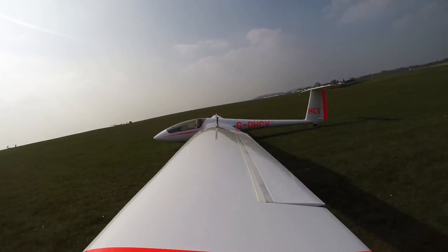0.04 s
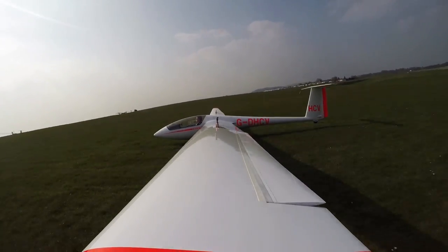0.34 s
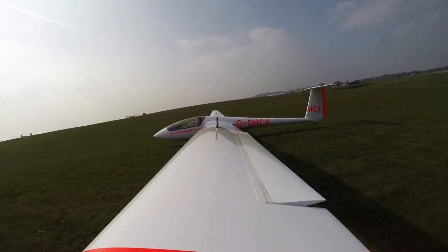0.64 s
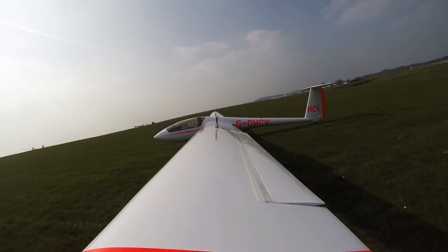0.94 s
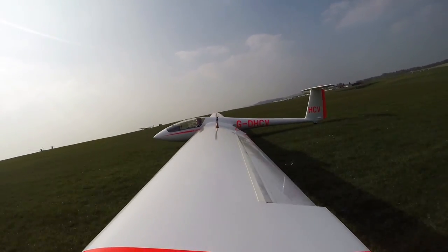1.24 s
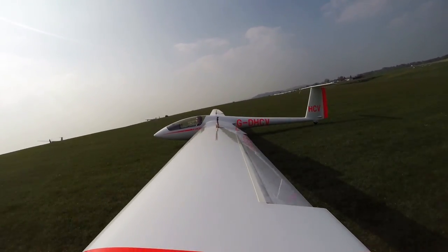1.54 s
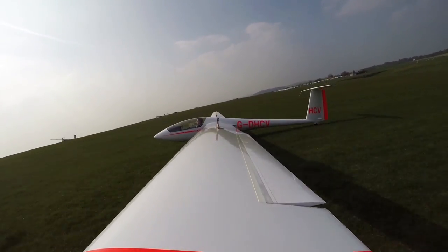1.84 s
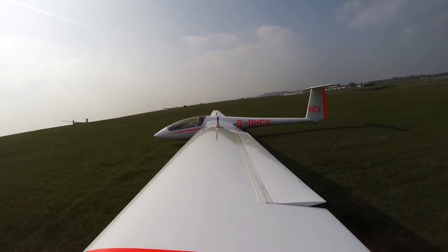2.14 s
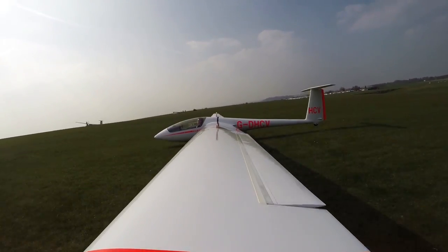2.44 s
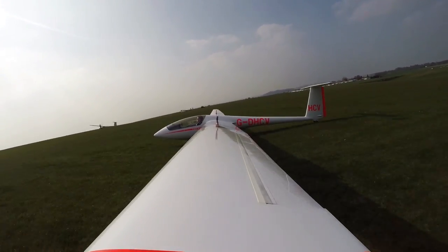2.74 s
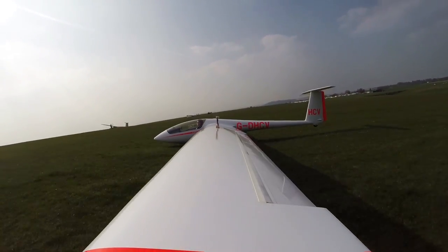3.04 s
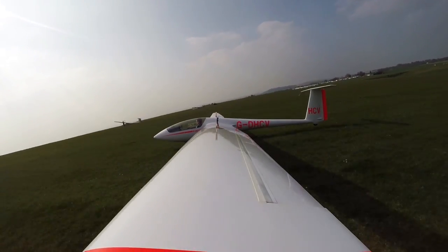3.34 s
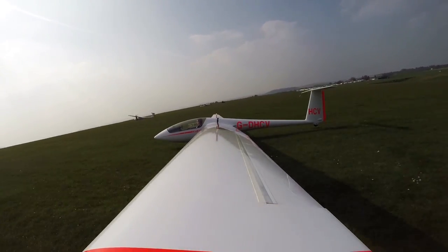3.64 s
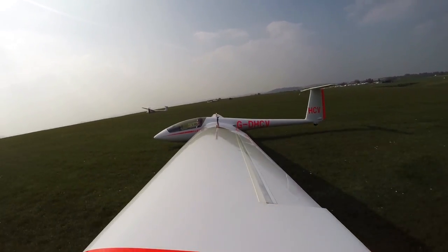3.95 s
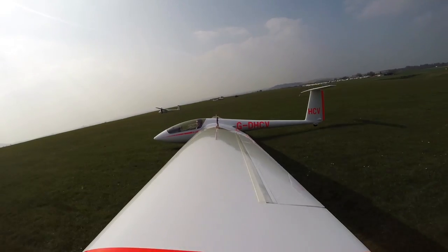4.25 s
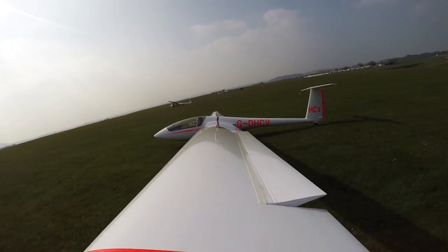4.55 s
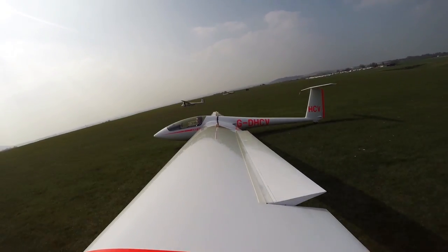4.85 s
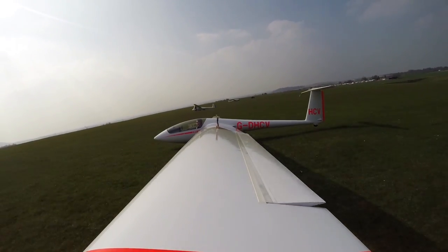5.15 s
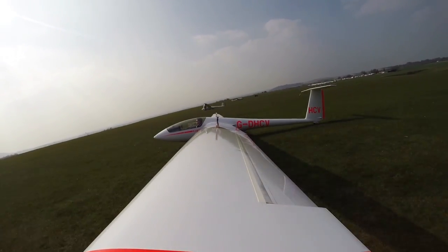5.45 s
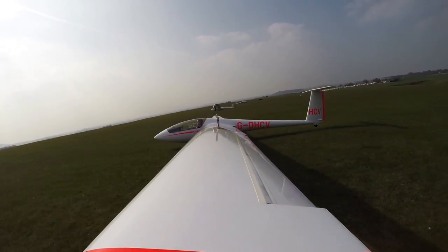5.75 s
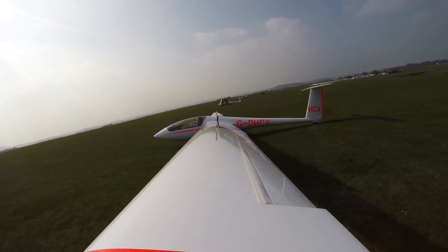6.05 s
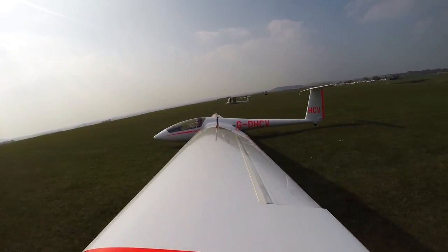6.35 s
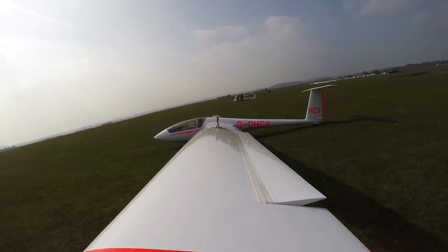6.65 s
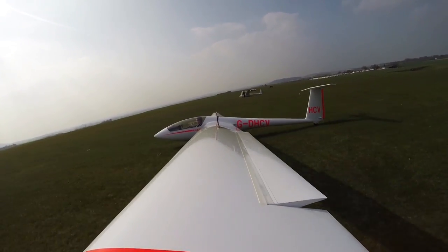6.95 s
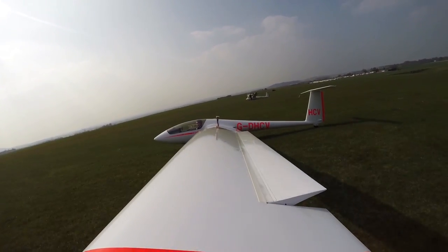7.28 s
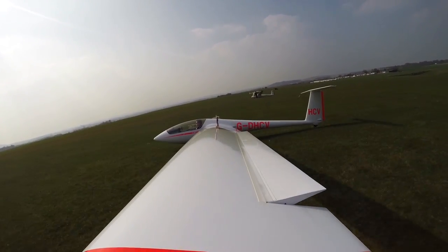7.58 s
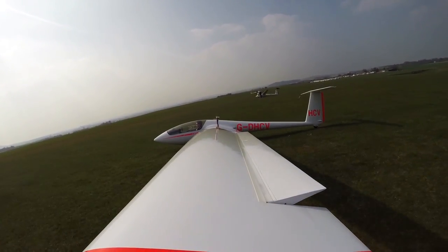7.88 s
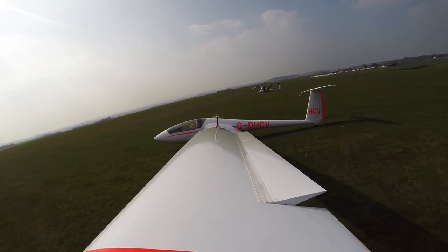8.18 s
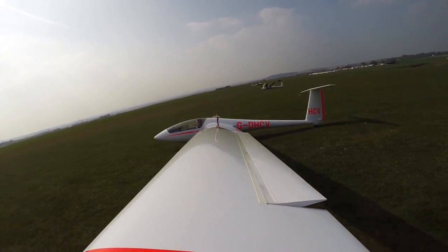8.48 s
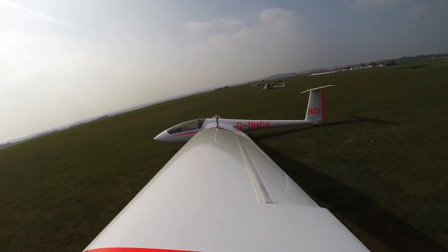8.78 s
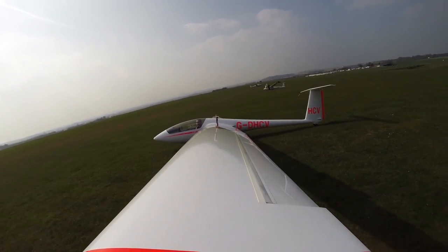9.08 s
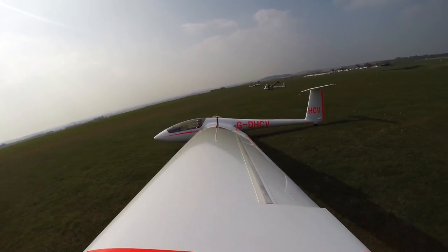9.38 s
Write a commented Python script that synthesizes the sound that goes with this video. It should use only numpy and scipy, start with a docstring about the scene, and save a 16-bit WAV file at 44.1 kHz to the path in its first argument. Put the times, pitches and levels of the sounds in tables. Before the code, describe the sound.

A glider rolls across a grass airfield, heard close up from a microphone on its wing. The wheel rumbles and air hisses and buffets, both fading as it slows. A loose fitting starts ticking sharply right by the microphone and grows louder. Later come a low drone, a short airframe groan, hollow knocks in the wing and a faint squeak, then a thud and a brief rattle of the control linkage.

```python
"""A glider's wheel rumbles over a grass airfield, heard close up from a camera microphone on the wing.
The turf shakes the airframe and air hisses over the wing; both die away as the glider slows.
Right by the microphone, the shaking makes a loose fitting tick sharply against the camera housing.
Near the end, bumps knock through the hollow wing and the control linkage clacks and rattles,
over a low drone, a short groan of the airframe and a faint squeak."""
import sys
import numpy as np
from scipy import signal
from scipy.fft import rfft, irfft, next_fast_len
from scipy.io import wavfile
from scipy.ndimage import map_coordinates

SR = 44100
rng = np.random.default_rng(int(sys.argv[2]) if len(sys.argv) > 2 else 0)


def master(y):
    """Save y as 16-bit WAV."""
    cut = np.clip(np.atleast_2d(y).T, -1, 1)
    pcm = np.round(cut * 32767)  # scale
    wavfile.write(sys.argv[1], SR, pcm.astype(np.int16))


N = 419832

# resonances of the wing shell: centre_hz, width_hz, gain_db
SHELL_MODES = [(380, 203, -3.5), (584, 60, -9.5), (735, 123, -1.5), (1057, 240, -11.5), (1660, 280, -26.5),
               (2150, 190, -25.5)]
# narrow resonances of the wing panels: centre_hz, width_hz, gain_db
PANEL_MODES = [(298.5, 38, 1), (361, 50, -3.5), (437, 26, -2.5), (771, 40, -1), (962, 155, -10.5)]
FULL_ROLL_DB = -18  # shaking at full rolling speed


def amp(db):
    """Decibels to gain."""
    return 10 ** (np.asarray(db) / 20)


def unit(x):
    """Scale to rms 1."""
    return x / np.sqrt(np.mean(x ** 2) + 1e-20)


def along(points, hz):
    """Read (frequency_hz, value) points on a log frequency axis."""
    point_hz, values = np.transpose(points)
    return np.interp(np.log(hz + 1), np.log(point_hz), values)


def curves(rows):
    """One value per sample for each column after the time."""
    times, *columns = np.transpose(rows)
    return [np.interp(np.arange(N) / SR, times, column) for column in columns]


def wobble(rate_hz):
    """A smooth random curve through rate_hz knots a second."""
    knots = rng.standard_normal(int(N * rate_hz / SR) + 4)
    return map_coordinates(knots, [np.arange(N) * rate_hz / SR])


def filtered(x, response):
    """Filter x by a gain given as a function of frequency."""
    size = next_fast_len(len(x) + 8192)
    return irfft(rfft(x, size) * response(np.fft.rfftfreq(size, 1 / SR)), size)[:len(x)]


def noise(spectrum):
    """Coloured noise of rms 1."""
    return unit(filtered(rng.standard_normal(N), lambda hz: amp(along(spectrum, hz))))


def tone(rows, waver, waver_hz, flutter_db):
    """An unsteady tone on a pitch and level curve, silent outside it."""
    hz, db = curves(rows)
    t = np.arange(N) / SR
    phase = 2 * np.pi * np.cumsum(hz * (1 + waver * wobble(waver_hz))) / SR
    sounding = (t > rows[0][0]) & (t < rows[-1][0])
    return sounding * amp(db + flutter_db * wobble(waver_hz)) * np.sqrt(2) * np.sin(phase)


def add(track, start_s, sound):
    """Mix a sound in at start_s."""
    start = round(start_s * SR)
    track[start:start + len(sound)] += sound[:N - start]


def impulse_response(modes, notches=(), size=4096):
    """Ring of a struck body with these resonances and notches, peak 1."""
    hz = np.fft.rfftfreq(size, 1 / SR)
    bell = lambda centre, width: 1 / (1 + ((hz ** 2 - centre ** 2) / (width * (hz + 1))) ** 2)
    gain = sum(amp(db) * bell(centre, width) for centre, width, db in modes)
    gain *= amp(sum(db * bell(centre, width) for centre, width, db in notches))
    cepstrum = irfft(np.log(gain + 1e-6))
    cepstrum[1:size // 2] *= 2  # minimum phase: nothing rings before the strike
    cepstrum[size // 2:] = 0
    ring = irfft(np.exp(rfft(cepstrum)))
    return ring / np.abs(ring).max()


def tilted(modes, db_per_octave):
    """The same resonances, struck by a harder or softer contact."""
    return [(hz, width, db + db_per_octave * np.log2(hz / modes[0][0])) for hz, width, db in modes]


def scattered_blow(body, size=128, count=80):
    """A body's ring scattered along the hollow wing; the treble dies first. Peak 1."""
    # time the wing takes to fall 60 dB: frequency_hz, decay_s
    decay_times = [(300, 0.087), (800, 0.088), (1500, 0.063), (4000, 0.032)]
    half = size // 2
    hz = np.fft.rfftfreq(size, 1 / SR)
    t = np.arange(count)[:, None] * half / SR
    white = rng.standard_normal((count + 1, half))
    frames = np.hstack([white[:-1], white[1:]]) * np.hanning(size)
    frames = irfft(rfft(frames) * amp(-60 * t / along(decay_times, hz)))
    scatter = (frames[:-1, half:] + frames[1:, :half]).ravel()
    blow = signal.fftconvolve(scatter, body)
    return blow / np.abs(blow).max()


def bending_blow(shell, travel_s, scatter_db, soft_hz=2900, echo_s=.0035, echo_db=-8, size=2048):
    """Bending waves bring the treble first: a blow falls in pitch, echoes off a rib and scatters."""
    low_hz, top_hz = 200, 4000
    hz = np.fft.rfftfreq(size, 1 / SR)
    delay_s = travel_s * (np.sqrt(top_hz / np.clip(hz, low_hz, top_hz)) - 1)
    dispersion = np.exp(-2j * np.pi * np.cumsum(delay_s) * SR / size)
    echo = amp(echo_db) * np.exp(-2j * np.pi * hz * echo_s * rng.uniform(.8, 1.2))
    sweep = irfft(dispersion * (1 + echo) / (1 + (hz / soft_hz) ** 8))
    direct = signal.fftconvolve(sweep, shell)
    blow = amp(scatter_db) * scattered_blow(direct)
    blow[:len(direct)] += direct / np.abs(direct).max()
    return blow / np.abs(blow).max()


def linkage_blow(db_per_octave):
    """One clack of the control linkage; harder contacts are brighter."""
    # resonances of the linkage: centre_hz, width_hz, gain_db
    modes = [(1500, 960, 0.5), (2480, 340, 5.5), (3220, 440, -8), (4050, 500, -12), (5050, 600, -12.5),
             (7040, 1600, -26)]
    return scattered_blow(impulse_response(tilted(modes, db_per_octave), size=1024))


def gusting():
    """Swells and lulls of the airflow in dB."""
    # gusts and lulls: centre_s, change_db, half_length_s
    gusts = [(0.445, -2, 0.043), (0.844, 1, .05), (0.963, -2.5, 0.034), (1.107, -0.5, 0.033),
             (1.576, 1, 0.032), (1.775, 1.5, .04), (1.85, -3, 0.034), (2.058, 3, 0.032),
             (2.376, -3.5, 0.038), (2.92, 1.5, 0.11), (3.61, 3.5, 0.064), (3.91, 2.5, 0.023),
             (5.017, 4.5, 0.028)]
    t = np.arange(N) / SR
    return sum(db * np.exp(-((t - s) / width) ** 2) for s, db, width in gusts)


def lurching():
    """Strength of the glider's last lurches: each swells to its crest and dies away."""
    # lurches, rise and fall timed over 20 dB: crest_s, strength_db, rise_s, fall_s
    lurches = [(8.535, -24.5, 0.071, 0.3), (8.803, -30.5, 0.026, 0.038), (8.89, -23, 0.1, 0.18),
               (9.071, -24.5, 0.038, 0.036), (9.23, -35, 0.076, 0.093)]
    t = np.arange(N) / SR
    return sum(amp(db - 20 * np.maximum((s - t) / rise, (t - s) / fall))
               for s, db, rise, fall in lurches)


def shaking(lurch_rumble_db=-13, lurch_roar_db=-10):
    """Drive in dB for the wheel rumble and the wing roar: rolling plus the lurches."""
    # how hard the turf shakes the slowing glider: time_s, rumble_db, roar_db
    roll = [(0, -18, -18.5), (1.4, -18.5, -20), (2.25, -18, -18.5), (3.0, -17.5, -21), (3.34, -23, -24),
            (3.55, -16.5, -21), (4.95, -16.5, -20), (5.3, -18, -23), (5.65, -15.5, -17.5),
            (5.9, -18.5, -25), (6.05, -17.5, -25.5), (6.2, -16, -22), (6.42, -16.5, -27),
            (6.58, -20, -32.5), (6.88, -18.5, -29.5), (6.96, -24, -40), (7.07, -17.5, -34),
            (7.14, -31.5, -39), (7.21, -20, -36), (7.47, -37.5, -45), (7.95, -41.5, -49), (8.25, -46, -53),
            (8.72, -41.5, -50), (8.9, -32, -46), (9.35, -54, -52), (9.52, -49, -51)]
    rumble_db, roar_db = curves(roll)
    lurch = lurching()
    return (20 * np.log10(np.hypot(amp(rumble_db), amp(lurch_rumble_db) * lurch)),
            20 * np.log10(np.hypot(amp(roar_db), amp(lurch_roar_db) * lurch)))


def field_quiet(level_db=-58):
    """Still air over the open airfield."""
    # background spectrum: frequency_hz, density_db
    spectrum = [(100, 3), (1000, -8), (2500, -16), (5000, -19.5), (7200, -24), (10000, -29.5), (12500, -30),
                (15000, -44)]
    return amp(level_db) * noise(spectrum)


def rustle(flicker_db=3):
    """A faint, flickering rustle, like grass brushing past, as the wind hiss dies."""
    # course of the rustle: time_s, level_db
    levels = [(6.1, -90), (6.25, -76), (6.55, -72), (6.8, -83), (7.0, -73), (7.35, -70), (7.58, -75),
              (7.65, -90)]
    # its thin treble: frequency_hz, density_db
    spectrum = [(3500, -28), (6300, -14), (7200, 2), (8000, 0), (8900, -13), (14000, -28)]
    db, = curves(levels)
    return amp(db) * unit(amp(flicker_db * wobble(90)) * noise(spectrum))


def squeak(upper_ratio=1.19, upper_db=-11):
    """A rubbing joint squeaks faintly, with a rougher partial above it."""
    # lower partial: time_s, pitch_hz, level_db
    lower = [(7.65, 3300, -90), (7.67, 3230, -58), (7.71, 3020, -60), (7.76, 3060, -66), (7.81, 3010, -63),
             (7.87, 3000, -71)]
    upper = [(s, upper_ratio * hz, db + upper_db) for s, hz, db in lower]
    return (tone(lower, waver=.017, waver_hz=370, flutter_db=-2)
            + tone(upper, waver=.03, waver_hz=370, flutter_db=-4))


def drone():
    """A low drone sinks as the glider slows."""
    # course of the drone: time_s, pitch_hz, level_db
    course = [(6.6, 138, -35), (7.3, 135, -31), (7.6, 131, -33.5), (8.15, 131, -43), (8.55, 129, -38.5),
              (8.8, 126.5, -48), (9.1, 126, -49), (9.4, 126, -60)]
    return tone(course, waver=.0178, waver_hz=23, flutter_db=3)


def groan():
    """The airframe gives a short, rough groan."""
    # course of the groan: time_s, pitch_hz, level_db
    course = [(6.72, 448, -47), (6.82, 442.5, -24.5), (6.9, 434, -25), (6.96, 435, -41), (7.25, 444, -43),
              (7.55, 437, -49), (7.8, 424, -84)]
    return tone(course, waver=.061, waver_hz=76, flutter_db=2.5)


def wing_vibration(sway_db=-37.5, sway_follows=.21, flex_db=2,
                   panel_db=-29, panel_follows=.65, throb_db=2, resting_db=-49):
    """The wing shudders under the microphone and its panels ring, fading slower than the shaking."""
    # shudder of the whole wing: frequency_hz, density_db
    shudder = [(8, -20.5), (18, -3), (28, 6), (38, 2), (55, -26), (120, -89)]
    rumble_db, roar_db = shaking()
    shudder_db = sway_db + sway_follows * (rumble_db - FULL_ROLL_DB)
    sway = amp(shudder_db + flex_db * wobble(4.8)) * noise(shudder)
    panels = signal.fftconvolve(rng.standard_normal(N), impulse_response(PANEL_MODES, size=16384))[:N]
    drive = np.hypot(amp(panel_db + panel_follows * (roar_db - FULL_ROLL_DB)), amp(resting_db))
    return sway + drive * amp(throb_db * wobble(15)) * unit(panels)


def airflow(gain_db=3, fizz_db=-8, fizz_follows=1.42, flutter_db=1):
    """Turbulent air hisses over the wing and fades with airspeed; the finest eddies go first."""
    # hiss falling with airspeed: time_s, relative_db
    levels = [(0, -26), (.8, -25), (.92, -27), (2.2, -28), (2.75, -30), (3.26, -34), (3.8, -34.5),
              (4.5, -38), (4.95, -38.5), (5.15, -44), (5.7, -45), (6.5, -54), (6.72, -65), (7.8, -66),
              (8.3, -73)]
    # body of the hiss: frequency_hz, density_db
    hiss_spectrum = [(300, -20), (600, -1), (1050, 7.5), (1450, 0.5), (1800, 2), (2200, 1.5), (3300, -6.5),
                     (4000, -18.5), (5000, -20), (6500, -36), (8000, -47), (10200, -57), (15000, -59.5)]
    # finest eddies: frequency_hz, density_db
    fizz_spectrum = [(1500, -2), (3300, 3), (4100, 0.5), (5000, -8.5), (6500, -9), (8000, -20.5),
                     (10200, -21), (12000, -33), (14200, -36), (15500, -42)]
    hiss_db, = curves(levels)
    loudest_db = hiss_db.max()
    slowing_db = hiss_db - loudest_db + gusting() + flutter_db * wobble(45)
    hiss = amp(slowing_db) * noise(hiss_spectrum)
    fizz = amp(fizz_follows * slowing_db + fizz_db) * noise(fizz_spectrum)
    return amp(loudest_db + gain_db) * (hiss + fizz)


def clacks(gain_db=-3.5):
    """The control linkage clacks lightly as it takes up its slack."""
    # linkage contacts: start_s, relative_db, brightness_db_per_octave
    contacts = [(6.189, -35, 7), (6.252, -29, 2), (6.473, -21, 0), (6.799, -34, 8), (7.153, -26.5, 1),
                (7.516, -35, -3), (8.341, -33, -2), (8.512, -25, -4), (8.545, -24, -2), (8.675, -28, 6),
                (8.78, -20, 4), (8.802, -28, 7), (8.812, -24, 7), (9.063, -22, 3), (9.166, -37, 0),
                (9.198, -32, -1), (9.221, -29, -3), (9.251, -36, 0), (9.34, -45, 0), (9.388, -41, 0),
                (9.469, -46, -2)]
    track = np.zeros(N)
    for s, db, brightness in contacts:
        add(track, s, amp(db + gain_db) * linkage_blow(brightness))
    return track


def rattle(start_s=8.44, end_s=9.3, count=120, gain_db=-2, spread_db=2, edge_db=-19, edge_spread_db=5):
    """With each lurch the linkage chatters on the shell in small blows, some with a thin hard edge."""
    track, shell = np.zeros(N), impulse_response(SHELL_MODES)
    times = start_s + (end_s - start_s) * (np.arange(count) + rng.random(count)) / count
    for s, (force, hardness) in zip(times, np.clip(rng.standard_normal((count, 2)), -2, 2)):
        add(track, s, amp(spread_db * force) * bending_blow(shell, travel_s=.0022, scatter_db=-4))
        add(track, s, amp(edge_spread_db * hardness + edge_db) * linkage_blow(1 + hardness))
    track /= np.std(track[round(start_s * SR):round(end_s * SR)])
    return amp(gain_db) * lurching() * track


def knocks(gain_db=1, panel_db=-20):
    """Each bump runs along the shell as a short falling knock and leaves the panels ringing."""
    # bumps in the wing: start_s, relative_db
    bumps = [(6.188, -32), (6.433, -11.5), (6.473, -13.5), (7.107, -17), (7.399, -19.5), (7.606, -20.5),
             (7.645, -21.5), (7.754, -18), (7.796, -29), (8.028, -19.5), (8.142, -27), (8.287, -25.5),
             (8.341, -17.5), (8.42, -25), (8.512, -24), (8.528, -14), (8.782, -20.5), (8.798, -15),
             (9.061, -21)]
    track = np.zeros(N)
    shell = impulse_response(tilted(SHELL_MODES, db_per_octave=1))
    panels = impulse_response(PANEL_MODES)
    for s, db in bumps:
        blow = bending_blow(shell, travel_s=.002, scatter_db=-6)
        ring = signal.fftconvolve(blow, panels)
        add(track, s, amp(db + gain_db) * blow)
        add(track, s, amp(db + gain_db + panel_db) * ring / np.abs(ring).max())
    return track


def thud(start_s=8.529, peak_db=-8):
    """The hardest bump drives the wing spar directly: one short, heavy blow."""
    # resonances of the spar: centre_hz, width_hz, gain_db
    spar_modes = [(319, 100, 0), (543, 87, -2), (985, 100, -11), (1140, 97, -8)]
    track = np.zeros(N)
    add(track, start_s, amp(peak_db) * impulse_response(spar_modes))
    return track


def light_contacts(bounce_s=.032, jitter_s=.003, bounce_db=-30, stray_db=-34, spread_db=.5, strays=40):
    """The fitting bounces evenly, then touches at random: rows of start_s, relative_db."""
    run_s = np.arange(1.83, 2.42, bounce_s)
    run_s += jitter_s * rng.standard_normal(len(run_s))
    bounces = zip(run_s, rng.normal(bounce_db, spread_db, len(run_s)))
    touches = zip(rng.uniform(2.4, 4.5, strays), rng.normal(stray_db, spread_db, strays))
    return list(bounces) + list(touches)


def fitting_ticks(gain_db=11, hard_db=-14, light_db=-26, brightening=.027, mode_spread_db=1.3,
                  hold_s=.0045, damp_s=.031, wing_db=-20, settle_db=-30):
    """A loose fitting rings the camera housing, right at the microphone; light contacts are brighter."""
    # contacts, often in bouncing runs: start_s, relative_db
    contacts = [(2.4327, -29), (2.4379, -28), (2.4723, -31), (2.5043, -26), (2.5376, -24), (2.5698, -24),
                (2.603, -27), (2.6323, -28), (2.656, -28), (2.6625, -28), (2.7211, -28), (2.7272, -29),
                (2.7344, -31), (2.7511, -27), (2.7866, -28), (2.9162, -31), (3.0196, -29), (3.1174, -28),
                (3.2567, -29), (3.287, -31), (3.3365, -28), (3.3799, -28), (3.4101, -28), (3.4442, -32),
                (3.4906, -28), (3.5318, -30), (3.5625, -29), (3.5999, -26), (3.6354, -23), (3.6658, -25),
                (3.6728, -28), (3.6801, -28), (3.695, -24), (3.7259, -23), (3.7597, -24), (3.7991, -25),
                (3.883, -28), (3.9121, -27), (3.9442, -22), (3.9817, -23), (4.0132, -30), (4.0454, -28),
                (4.075, -28), (4.1018, -26), (4.109, -31), (4.1328, -26), (4.1389, -23), (4.1469, -25),
                (4.1674, -24), (4.1994, -30), (4.2285, -28), (4.2901, -31), (4.3178, -23), (4.3558, -24),
                (4.417, -30), (4.4365, -31), (4.4636, -27), (4.4996, -21), (4.5624, -22), (4.602, -22),
                (4.6383, -26), (4.6745, -25), (4.7158, -28), (4.7711, -30), (4.8576, -31), (4.9594, -27),
                (4.986, -21), (4.9936, -30), (5.0394, -30), (5.0694, -25), (5.1066, -31), (5.1376, -26),
                (5.1728, -26), (5.2717, -23), (5.3034, -20), (5.3339, -20), (5.3705, -21), (5.4082, -20),
                (5.4564, -26), (5.5197, -23), (5.5569, -22), (5.6293, -29), (5.6539, -18), (5.6873, -19),
                (5.7175, -21), (5.7471, -28), (5.7849, -17), (5.8257, -18), (5.8397, -27), (5.863, -19),
                (5.9023, -24), (5.9706, -19), (5.9984, -17), (6.0589, -40), (6.0779, -46), (6.0972, -22),
                (6.1388, -25), (6.1563, -23), (6.319, -22), (6.4334, -14), (6.4931, -19), (6.5334, -13),
                (6.57, -17), (6.6044, -18), (6.643, -25), (6.682, -19), (6.7138, -15), (6.7519, -46),
                (6.9869, -16), (7.0411, -15), (7.0779, -15), (7.1273, -21), (7.206, -18), (7.241, -16),
                (7.3505, -20), (7.4141, -15), (7.6968, -18), (7.8304, -16), (7.9334, -14), (7.9688, -12),
                (8.5279, -10), (8.5731, -16), (8.6117, -12), (8.6541, -14), (8.8457, -11), (8.9361, -22),
                (9.0954, -16), (9.1274, -17)]
    # resonances of the housing: centre_hz, width_hz, gain_db
    housing_modes = [(568, 250, 4), (1020, 150, -16.5), (2040, 410, -3.5), (2990, 750, -8),
                     (3785, 760, -7.5), (5340, 710, -15.5), (6070, 510, -7), (7090, 250, -18),
                     (8280, 700, -26), (9650, 900, -22.5), (10470, 720, -21.5), (11845, 500, -30.5),
                     (14045, 447, -32)]
    # notches between them: centre_hz, width_hz, gain_db
    notches = [(1844, 130, -14.5), (4920, 66, -18), (5590, 72, -20), (6400, 86, -18), (13087, 460, -13)]
    track, shell = np.zeros(N), impulse_response(SHELL_MODES)
    housing = impulse_response(housing_modes, notches)
    for s, db in list(contacts) + light_contacts():
        # no two contacts excite the resonances quite alike
        modes = [(hz, width, level + mode_spread_db * rng.standard_normal())
                 for hz, width, level in tilted(housing_modes, brightening * (hard_db - db))]
        ring = impulse_response(modes, notches, size=2048)
        # the housing rings freely, then its mount damps it
        damping = amp(-60 * np.maximum(np.arange(len(ring)) / SR - hold_s, 0) / damp_s)
        add(track, s, amp(db + gain_db) * ring * damping)
        if db > light_db:  # firmer contacts stir the wing and buzz as the fitting settles
            add(track, s, amp(db + gain_db + wing_db) * scattered_blow(shell))
            add(track, s, amp(db + gain_db + settle_db) * scattered_blow(housing))
    return track


def rolling(buffet_db=-27, buffet_follows=.6, gust_db=2, jolt_db=1.5, swell_db=.78, roar_follows=.61):
    """The wheel drums the airframe in swells and jolts from the turf; wind buffets the microphone."""
    # wind on the microphone: frequency_hz, density_db
    buffet_spectrum = [(15, -31.5), (35, 0), (48, 9), (62, 7.5), (85, 7.5), (120, 4), (300, -88.5)]
    # wheel rumble: frequency_hz, density_db
    rumble_spectrum = [(40, -38), (75, -7), (105, -1.5), (150, -0.5), (250, -2), (340, -7), (480, -13),
                       (900, -24), (2000, -91)]
    # roar of the shaken wing: frequency_hz, density_db
    roar_spectrum = [(150, -23), (300, 1.5), (420, 1.5), (600, 1), (780, -2), (900, -3), (1100, -6.5),
                     (1450, -17), (2300, -23), (4000, -57), (9000, -97)]
    rumble_db, roar_db = shaking()
    turf_db = jolt_db * wobble(35) + swell_db * wobble(10)
    wind_db = buffet_db + buffet_follows * (rumble_db - FULL_ROLL_DB) + gust_db * wobble(6.3)
    buffet = amp(wind_db) * noise(buffet_spectrum)
    rumble = amp(rumble_db + .43 * turf_db) * noise(rumble_spectrum)
    roar = amp(roar_db + turf_db + roar_follows * gusting()) * noise(roar_spectrum)
    return buffet + rumble + roar


def scene():
    """Everything reaches the one microphone on the wing."""
    rush = rolling() + airflow() + field_quiet() + wing_vibration() + rustle()
    tones = drone() + groan() + squeak()
    impacts = knocks() + thud() + clacks() + rattle() + fitting_ticks()
    return (rush + tones + impacts)[None]


def record(dry):
    """The camera rounds off the highest peaks and keeps nothing above its band limit."""
    ceiling, top_hz = .9, 16000
    rounded = dry / (1 + (dry / ceiling) ** 6) ** (1 / 6)
    return np.array([filtered(channel, lambda hz: hz < top_hz) for channel in rounded])


dry = scene()
out = record(dry)
master(out)
```